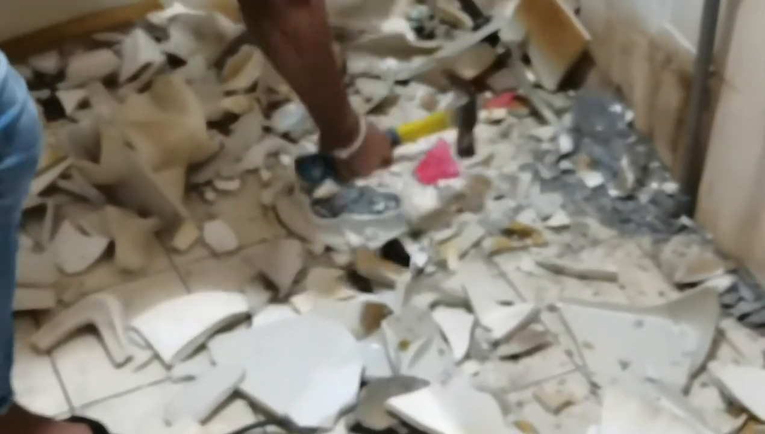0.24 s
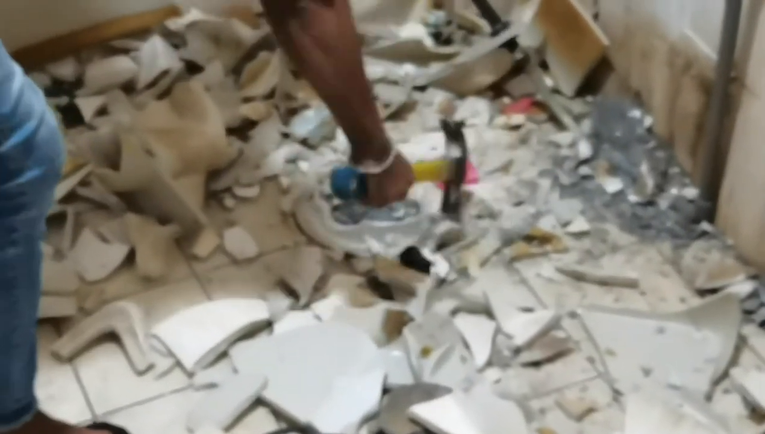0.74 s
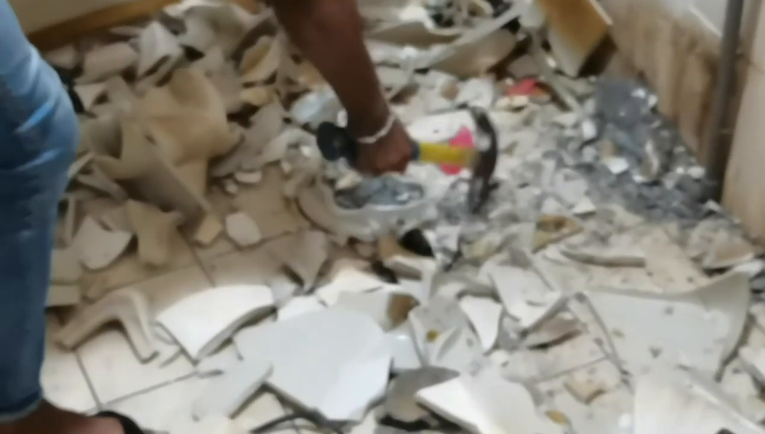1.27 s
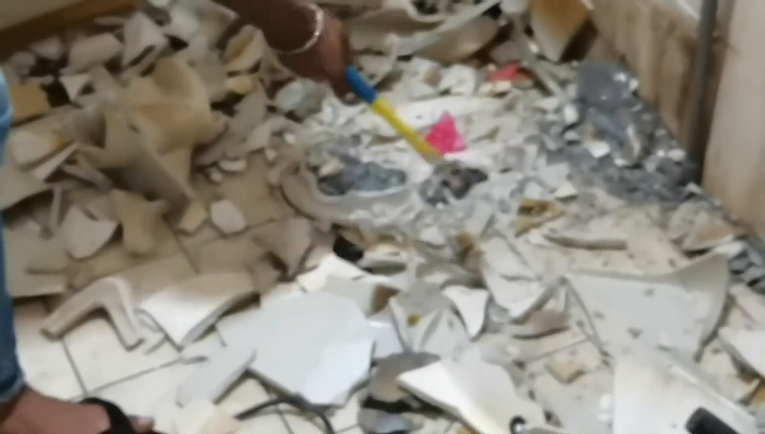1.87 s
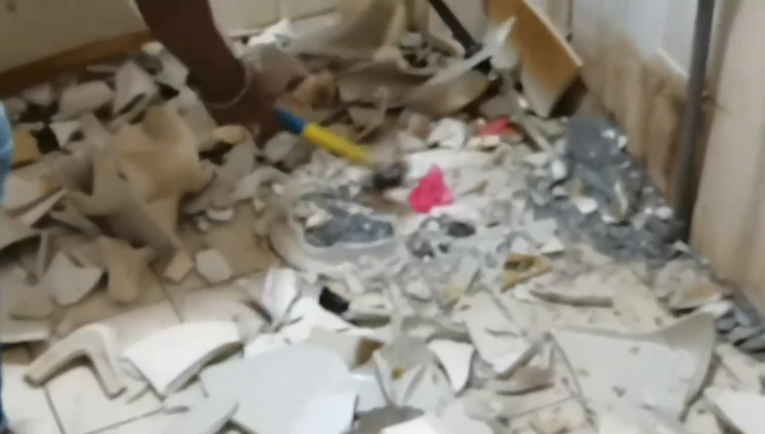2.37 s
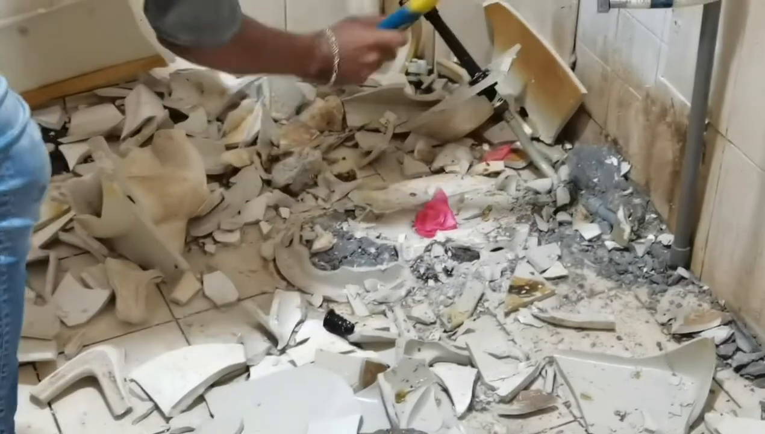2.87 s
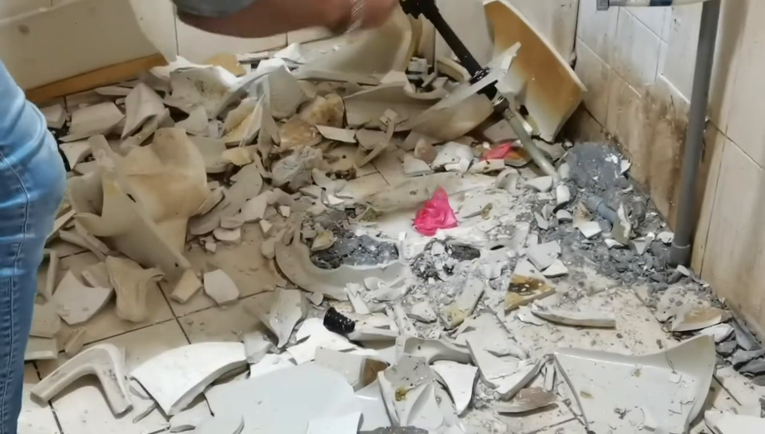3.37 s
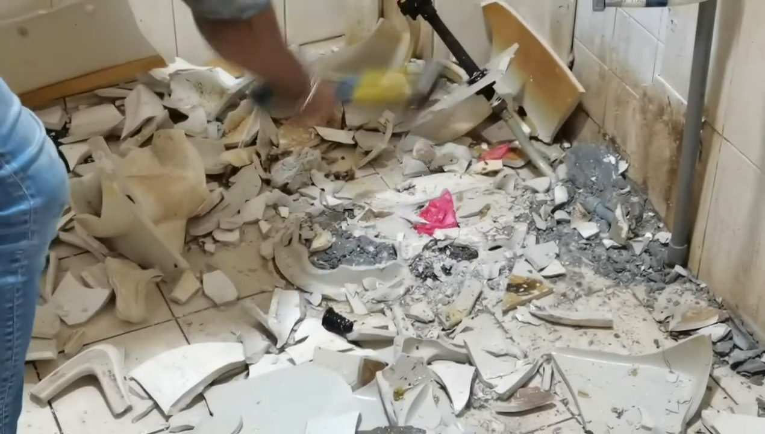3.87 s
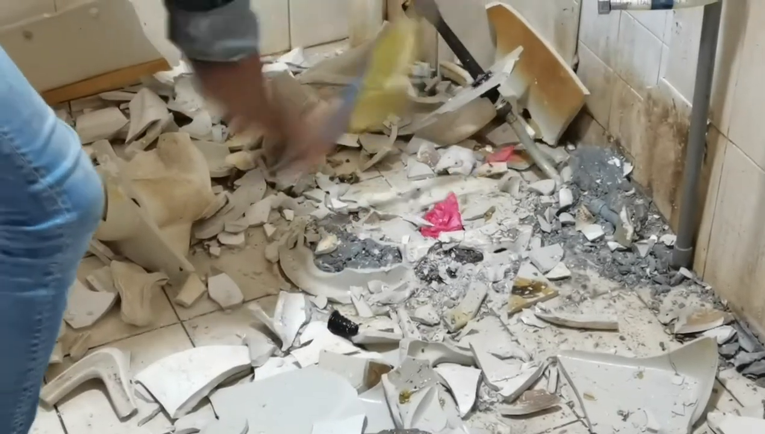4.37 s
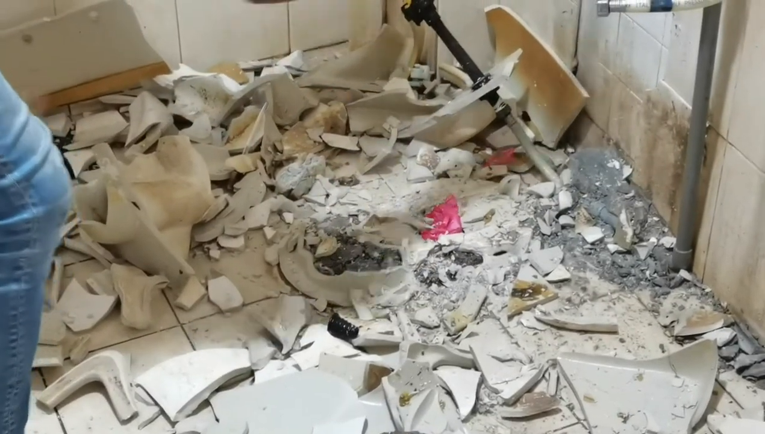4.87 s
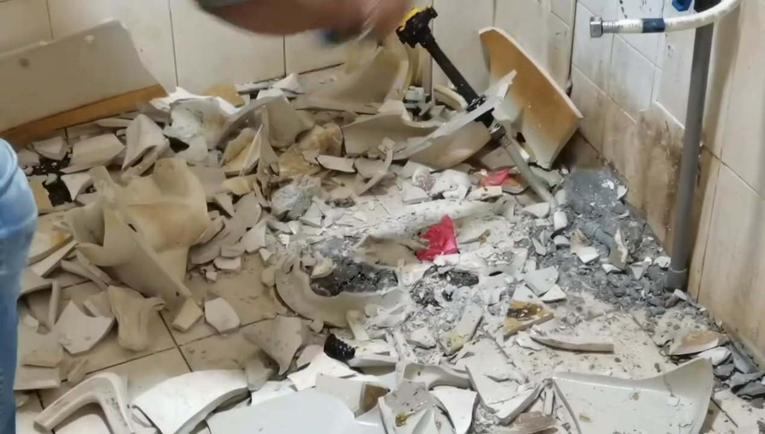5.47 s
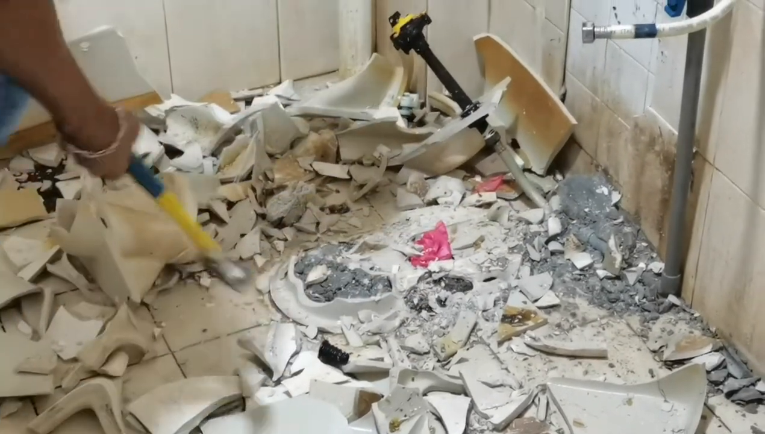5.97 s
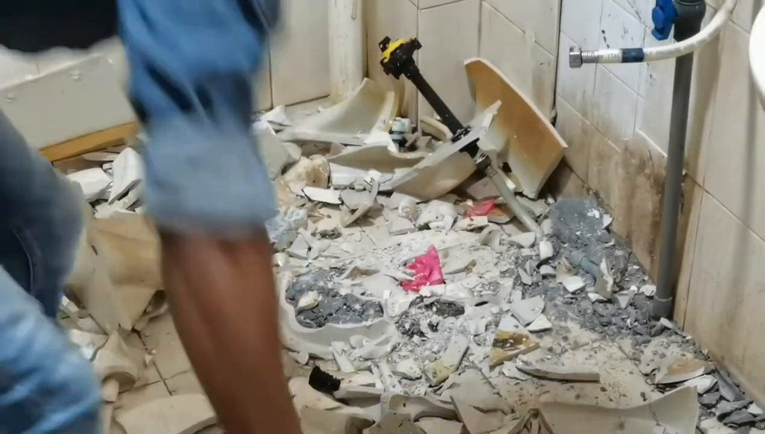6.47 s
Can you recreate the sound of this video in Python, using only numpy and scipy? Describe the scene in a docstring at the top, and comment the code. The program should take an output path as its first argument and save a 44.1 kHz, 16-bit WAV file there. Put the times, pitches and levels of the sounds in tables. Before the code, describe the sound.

A steel hammer pounds broken ceramic in rapid, crunching blows, shards clinking and chips scattering across tiles in a small echoing bathroom.

```python
"""In a small tiled bathroom, a steel hammer pounds the remains of a ceramic toilet, at first nearly four blows
a second. Each blow is a burst of tiny random cracks that crushes ceramic, thuds into the floor, rings the
hammer head and throws chips and dust. Loose shards clink in the rubble as struck modes, and fragments scuff
the tiles. Decaying noise bands make the hard walls ring on. Now and then fingers bump the right microphone
port of a hand-held phone or rub it, over a faint building rumble."""
import sys
import numpy as np
from scipy import signal
from scipy.fft import rfft, irfft
from scipy.io import wavfile

SR = 44100
rng = np.random.default_rng(int(sys.argv[2]) if len(sys.argv) > 2 else 0)


def transcribe(u):
    """Save the signal u as a 16-bit wav file named by the first command-line argument.

    u: samples, shape (n,) or (channels, n), limited to [-1, 1]; the rate is SR.
    q: integer samples, one column per channel.
    """
    v = np.clip(np.atleast_2d(u).T, -1, 1)
    q = np.round(v * 32767).astype(np.int16)
    wavfile.write(sys.argv[1], SR, q)


N = 297222


def undb(db):
    """Decibels to gain."""
    return 10 ** (np.asarray(db) / 20)


def lookup(points, hz):
    """Read a table of (Hz, value) on a log-frequency axis."""
    f, value = np.transpose(points)
    return np.interp(np.log(np.maximum(hz, 1)), np.log(f), value)


def colour(x, points, size=2048):
    """Causal (minimum-phase) filter with the given (Hz, dB) response."""
    gain = undb(lookup(points, np.fft.rfftfreq(size, 1 / SR)))
    cepstrum = irfft(np.log(gain))
    # folding the cepstrum forward makes the response causal
    cepstrum[1:size // 2] *= 2
    cepstrum[size // 2 + 1:] = 0
    response = irfft(np.exp(rfft(cepstrum)))
    return np.apply_along_axis(lambda channel: signal.fftconvolve(channel, response)[:len(channel)], -1, x)


def band(x, lo_hz, hi_hz, order=2):
    """Butterworth band-pass."""
    return signal.sosfilt(signal.butter(order, [lo_hz, hi_hz], "band", fs=SR, output="sos"), x)


def unit(x):
    """Scale to unit energy per channel, averaged over the channels."""
    energy = np.mean(np.sum(x ** 2, axis=-1))
    return x / np.sqrt(energy)


def fade(t, t60):
    """Exponential decay, 60 dB down after t60 seconds."""
    return np.exp(-np.log(1000) * t / t60)


def ring(t, hz, t60):
    """One struck mode: a decaying sine."""
    return np.sin(2 * np.pi * hz * t) * fade(t, t60)


def resonate(x, hz, width_hz):
    """What one mode makes of x, at unit energy."""
    return unit(signal.lfilter(*signal.iirpeak(hz, hz / width_hz, fs=SR), x))


def add(out, s, x):
    """Mix a sound into both channels at time s."""
    i = max(int(s * SR), 0)
    out[:, i:i + x.shape[-1]] += x[..., :N - i]


def cracks(envelope, rate, spread_db=4):
    """Tiny fractures at random moments (rate per second), of uneven size and either sign."""
    n = len(envelope)
    size = undb(spread_db * np.minimum(rng.exponential(size=n), 3))
    happens = rng.random(n) < rate / SR
    return envelope * size * rng.choice([-1, 1], n) * happens


AMBIENCE_DB = -55.5
# Tone of the building rumble. Each row: frequency in Hz, level in dB.
RUMBLE_TONE = [(25, -4), (110, 0), (250, -11), (515, -22), (1100, -23), (2000, -30), (3300, -36),
               (8000, -39), (15000, -48)]


def ambience():
    """Faint steady rumble of the building: noise shaped by a falling spectrum."""
    return undb(AMBIENCE_DB) * np.sqrt(N) * unit(colour(rng.standard_normal((2, N)), RUMBLE_TONE))


# Reverberation of the tiled room. Each row: frequency in Hz, 60 dB decay time in seconds.
ROOM_DECAY = [(60, 0.37), (150, 0.26), (280, 0.3), (550, 0.4), (1300, 0.34), (3000, 0.24), (7500, 0.2),
              (14000, 0.099)]


def reflections(count=8):
    """Dense echoes from close tiled walls in octave-spaced bands, with the energy each keeps per sample."""
    centres_hz = np.geomspace(110, 14000, count)
    size = 2 ** 17
    noise = rfft(rng.standard_normal(size))
    hz = np.fft.rfftfreq(size, 1 / SR)
    # neighbouring bands crossfade
    echoes = [irfft(noise * lookup(np.c_[centres_hz, share], hz)) for share in np.eye(count)]
    kept_energy = fade(1 / SR, lookup(ROOM_DECAY, centres_hz)) ** 2
    return list(zip(echoes, kept_energy))


def fracture(force, walls, direct_db, shade_db=-4, rate=9000, spread_s=0.019, late_share=0.22):
    """Tiny cracks heard directly, then as a diffuse field that the force fills and the walls drain."""
    n = len(force)
    starts = rng.integers(0, SR * 2, 2)
    # part of the sound crosses the room before it joins the echo
    step = 1 / (SR * spread_s)
    crossing = signal.lfilter([step], [1, step - 1], force ** 2)
    feed = (1 - late_share) * force ** 2 + late_share * crossing
    field = 0
    for echo, keep in walls:
        level = np.sqrt(signal.lfilter([1], [1, -keep], feed))
        field = field + np.array([echo[i:i + n] for i in starts]) * level
    direct = unit(cracks(force, rate))
    # the right port faces away from the work and hears it slightly later
    far = np.pad(direct, (rng.integers(4, 14), 0))[:n]
    return unit(field) + undb(direct_db) * np.array([direct, undb(shade_db) * far])


# Fingers bumping the phone. Each row: start in seconds, level in dB, pitch in Hz.
FINGER_BUMPS = [(2.2219, -2.5, 1120), (2.2684, -3, 513), (2.2775, 1, 418), (2.303, -7, 117),
                (2.3561, -8.5, 333), (2.365, -12, 232), (2.3986, -3.5, 454), (2.447, -7, 402),
                (5.242, -22, 233), (6.201, -15, 440), (6.41, -30.5, 296)]
# A finger sliding over the right port. Each row: centre in seconds, level in dB, length in seconds.
PORT_RUBS = [(2.277, -22.5, 0.0045), (2.315, -15, 0.011)]


def handling(t, bump_cycles=2.2, skin_db=-18.5, rumble_db=1, rumble_lead_s=0.0058, rumble_stretch=1.4,
             left_db=-32):
    """Fingers reach the right port directly: dry bumps, and rubs that rumble in pressing and hiss in sliding."""
    port = np.zeros((2, N))
    for s, db, hz in FINGER_BUMPS:
        skin = band(rng.standard_normal(len(t)), 300, 4200) * fade(t, 0.022)
        add(port, s, undb(db) * (undb(skin_db) * skin - ring(t, hz, bump_cycles / hz)))
    slips = cracks(np.ones(N), rate=8600)
    rumble = undb(rumble_db) * unit(band(slips, 78, 530))
    hiss = unit(band(band(slips, 680, 1700, order=1), 160, 15000, order=4))
    for s, db, length in PORT_RUBS:
        since = np.arange(N) / SR - s
        # the press comes a little before the slide and swells more broadly
        press = np.exp(-((since + rumble_lead_s) / (rumble_stretch * length)) ** 2)
        slide = np.exp(-(since / length) ** 2)
        port += undb(db) * np.sqrt(N) * (press * rumble + slide * hiss)
    return port * np.array([[undb(left_db)], [1]])


def pieces(shock, count=7, lo_hz=950, hi_hz=7000):
    """Other fragments are met each time, so their damped modes lie somewhere else."""
    # one random pitch in each equal step of the log range
    place = (np.arange(count) + rng.random(count)) / count
    pitches = lo_hz * (hi_hz / lo_hz) ** place
    return unit(sum(resonate(shock, hz, 70) / np.sqrt(hz) for hz in pitches))


# Tone of the grinding. Each row: frequency in Hz, level in dB.
SCUFF_TONE = [(300, -22), (1200, -4), (2000, 1), (4000, 4.5), (7400, 0), (11000, 2), (15000, -19)]


def scuff(t, walls, length, direct_db=-6, pieces_db=-4):
    """Fragments slide over the tiles in one swell of grinding, which sets a few of them ringing."""
    grind = fracture(np.sin(np.pi * np.minimum(t / length, 1)), walls, direct_db)
    return unit(unit(colour(grind, SCUFF_TONE)) + undb(pieces_db) * pieces(grind))


# Rubble scuffed along the tiles. Each row: start in seconds, length in seconds, strength in dB.
SCUFF_CUES = [(6.16, 0.038, -28), (6.202, 0.022, -9.5), (6.445, 0.2, -21.5)]


def scuffing(t, walls):
    """Rubble is dragged over the tiles in single strokes of grinding."""
    out = np.zeros((2, N))
    for s, length, db in SCUFF_CUES:
        add(out, s, undb(db) * scuff(t, walls, length))
    return out


SHARD_WIDTH_HZ = 55  # bandwidth of each shard mode


def clink(t, walls, modes, chatter_db, contact_t60=.01, rise_s=.0006, direct_db=-5, first_bounce_db=-20,
          bounce_db=-5, neighbour_db=-13, count=3):
    """A shard knocks and bounces, ringing in its modes while its rough edge chatters on the rubble."""
    force = fade(t, contact_t60) * (1 - np.exp(-t / rise_s))
    for k, landing in enumerate(np.cumsum(rng.uniform(.008, .022, count))):
        bounce = (t > landing) * fade(np.abs(t - landing), 0.0092)
        force = force + undb(first_bounce_db + bounce_db * k) * bounce
    contact = fracture(force, walls, direct_db)
    out = 0
    for hz, db in modes:
        chatter = undb(chatter_db) * unit(band(contact, hz / 1.35, hz * 1.3))
        # the piece that it strikes answers at another pitch
        neighbour = undb(neighbour_db) * resonate(contact, hz * rng.uniform(1.1, 1.4), SHARD_WIDTH_HZ)
        out = out + undb(db) * unit(resonate(contact, hz, SHARD_WIDTH_HZ) + neighbour + chatter)
    return out


# Modes of the loose shards, listed by shard name. Each row: frequency in Hz, level in dB.
SHARD_MODES = {"slab": [(1528, -2.5), (2110, -9), (3822, -9.5), (7418, -12)], "rim": [(1830, -6),
               (4414, 2.5), (6410, 2), (10500, 0.5)], "wedge": [(2228, -5), (2874, -2), (3929, -14),
               (6965, -4.5)], "plate": [(2885, -21), (4134, -1), (6018, 5), (11175, 1.5)],
               "strip": [(2700, -7), (4820, -5.5), (7690, 5), (12600, -11)], "corner": [(4758, -4),
               (6104, -6.5), (8494, 0.5), (11757, 1)], "splinter": [(3746, -10), (5318, 1), (8451, 0),
               (13555, 1)], "sliver": [(5124, -14), (6535, -7), (9453, 6), (12220, 3)],
               "lid": [(2295, -11.5), (2510, 0), (3050, -28)], "tab": [(2433, -15), (3865, -4), (4295, -4),
               (7407, -9)], "base": [(1205, -0.5), (3000, -16), (10300, -14)], "flake": [(7827, -19),
               (10314, 0.5), (11950, -2)]}
# Loose shards knocking together. Each row: start in seconds, strength in dB, edge chatter in dB, shard name.
CLINK_CUES = [(0.002, 4.5, -6, "wedge"), (1.409, 0.5, 6, "rim"), (1.4391, 7.5, -8, "rim"),
              (1.5513, 5.5, -12, "wedge"), (1.607, 0, 2, "plate"), (1.787, -12.5, -3, "flake"),
              (2.858, -16, 3, "strip"), (2.8867, -6.5, -3, "strip"), (2.962, -11, -6, "strip"),
              (3.995, -18, -6, "sliver"), (4.032, -17, 2, "flake"), (4.096, -21.5, 2, "flake"),
              (4.807, 2.5, 1, "rim"), (4.8966, 3.5, 3, "corner"), (4.988, -12.5, -9, "sliver"),
              (5.035, -12, -15, "sliver"), (5.1633, -7, -1, "rim"), (5.2094, -4, -2, "flake"),
              (5.356, -4, -5, "flake"), (5.9547, -18.5, -35.5, "flake"), (6.0803, -33, -36, "splinter"),
              (6.163, -26, -22, "tab"), (6.2188, -3.5, -18, "slab"), (6.533, -23.5, -12, "base"),
              (6.627, -3, -8, "lid")]


def clinking(t, walls):
    """Loose shards knock together in the rubble, each shape with its own set of modes."""
    out = np.zeros((2, N))
    for s, db, chatter_db, shard in CLINK_CUES:
        add(out, s, undb(db) * clink(t, walls, SHARD_MODES[shard], chatter_db))
    return out


def dust(t, walls, settle_t60=0.39, lo_hz=5200, hi_hz=15000, direct_db=-3, count=14):
    """Crumbs of glaze trickle down through the rubble in faint, uneven ticks."""
    ticks = np.zeros(len(t))
    for when, size in rng.random((count, 2)):
        ticks[int(when * len(t))] = size ** 2
    force = signal.fftconvolve(ticks * fade(t, settle_t60), fade(t[:SR // 20], .012))[:len(t)]
    return unit(band(fracture(force, walls, direct_db), lo_hz, hi_hz))


LEAD_S = .008  # from the start of a blow's sound to its full force


def chips(t, count=30, delay=0.11, t60=.07, lo_hz=3000, hi_hz=14000, rattle=.8):
    """Small chips thrown by a blow land with high, short, rattling pings; late ones are weak."""
    out = np.zeros((2, len(t)))
    brief = t[:SR // 8]
    knots = brief[::100]
    for wait, pitch, *sizes in rng.random((count, 4)):
        start = LEAD_S - delay * np.log(1 - wait)
        speed = fade(start, .5)
        wobble = 1 + rattle * np.interp(brief, knots, rng.standard_normal(len(knots)))
        ping = speed * wobble * ring(brief, lo_hz + pitch * (hi_hz - lo_hz), t60)
        # its size differs between left and right, which places it
        out += np.outer(sizes, np.pad(ping, (int(start * SR), len(t)))[:len(t)])
    return unit(out)


# Modes of the hammer head, damped by the hand.
# Each row: frequency in Hz, half the bandwidth of each of its two resonators in Hz, level in dB.
HAMMER_MODES = [(4300, 70, 0), (4390, 110, -5), (5600, 70, -17), (7634, 70, -11), (8190, 90, -8),
                (11720, 100, -18)]


def hammer(shock, detune=0.01):
    """The steel head rings in its modes, struck and gripped a little differently each time."""
    luck = rng.standard_normal((len(HAMMER_MODES), 2))
    out = 0
    for (hz, half_width, db), (strike, grip) in zip(HAMMER_MODES, luck):
        hz = hz * (1 + detune * grip)
        mode = resonate(resonate(shock, hz, 2 * half_width), hz, 2 * half_width)
        out = out + undb(db + 2 * strike) * mode
    return unit(out)


# Tone of crushed ceramic. Each row: frequency in Hz, level in dB.
CRUSH_TONE = [(30, -12.5), (70, -7.5), (130, -3.5), (260, 0), (420, -2.5), (650, 1.5), (1300, 5.5),
              (2300, 3), (3300, 0), (5500, -3), (7500, 0.5), (8900, -4.5), (10300, 4), (15000, -7)]


def blow(t, walls, strength_db, brightness, thud_db, ring_db, snap_db, bite, fragment_hz,
         strike_db=0, strike_t60=0.019, fragment_db=-7, fragment_width_hz=260, crush_t60=0.084,
         crumble_db=-19, crumble_t60=0.32, crumble_per_snap=0.59, jolt_db=-25, jolt_growth=0.6,
         dust_db=-28, knock_db=8, crack_db=3.5, grit_db=4, glaze_db=-1.0, pieces_db=-7, chips_db=-11,
         shudder_db=-25, shudder_t60=.4):
    """The head bites in, crushes ceramic and rests in crumbling grit; a snappy blow crumbles less."""
    stopped = np.maximum(t - LEAD_S, 0)
    onset = np.exp(np.minimum(t - LEAD_S, 0) / bite)
    # grit gives way and lands in uneven spurts
    knots = t[::200]
    spurts = undb(np.interp(t, knots, 6 * rng.standard_normal(len(knots)) - 4))
    crumble = undb(crumble_db - crumble_per_snap * snap_db) * spurts * fade(stopped, crumble_t60)
    strike = undb(strike_db) * fade(stopped, strike_t60)
    force = onset * (strike + fade(stopped, crush_t60) + crumble)
    crush = colour(fracture(force, walls, snap_db), CRUSH_TONE)
    # the shock of the impact keeps steel and fragments vibrating after the crush is over
    shudder = undb(shudder_db) * fade(stopped, shudder_t60)
    shock = fracture(onset * (fade(stopped, 0.0072) + shudder), walls, 0)
    # the floor answers with a dull knock and a deep jolt
    thud = unit(band(crush, 110, 428)) + undb(-5.5) * resonate(crush, 253.4, 29)
    jolt = unit(ring(stopped, 72, 0.065) + ring(stopped, 90, 0.13))
    # the body cracks an octave below the brightness pivot, grit lies one above it and glaze splinters two
    crack = unit(unit(band(crush, 680, 3200, order=3)) + undb(pieces_db) * pieces(shock))
    # the fragment under the head resounds at its own pitch
    fragment = resonate(fracture(force, walls, snap_db), fragment_hz, fragment_width_hz)
    crack = unit(crack + undb(fragment_db) * fragment)
    grit = unit(band(crush, 3700, 8800, order=3)) + undb(chips_db) * chips(t)
    glaze = unit(band(crush, 9400, 17500, order=3))
    ceramic = undb(crack_db - brightness) * crack
    ceramic = ceramic + undb(grit_db + brightness) * grit
    ceramic = ceramic + undb(glaze_db + 2 * brightness) * glaze
    # the jolt grows faster than the blow, so only the hardest ones shake the floor deeply
    floor = undb(jolt_db + jolt_growth * strength_db) * jolt + undb(knock_db + thud_db) * thud
    return ceramic + floor + undb(ring_db) * hammer(shock) + undb(dust_db) * dust(t, walls)


BITE_LEAD_S = .005  # each blow's sound starts this long before its listed time
# Hammer blows and taps. Each row: time in seconds, strength in dB, brightness in dB per octave,
# floor thud in dB (before the knock gain), hammer ring in dB, direct snap over echo in dB,
# bite time constant in seconds, pitch of the struck fragment in Hz.
BLOW_CUES = [(0.029, 9, -2.2, -16, 1, -9, 0.0065, 2142), (0.264, 10, -0.5, -12.5, -5, -3.5, 0.00086, 2185),
             (0.515, 8.5, 0.1, -15, 2.5, -4.5, 0.0016, 1340),
             (0.773, 8, 0.2, -13.5, -3.5, -3.5, 0.00085, 1675),
             (1.023, 8, -0.1, -14, -12, -3, 0.00073, 1340), (1.284, 6.5, 1.5, -20, -2.5, -15, 0.003, 1800),
             (1.528, -1.5, 4.5, -13.5, 5, -10, 0.008, 2858), (1.834, 3.5, -4, -9, 5.5, -0.5, 0.003, 1590),
             (2.104, 1.5, 0, -6.5, 0.5, 4.5, 0.00093, 1206), (2.426, 0.5, 3, -5, -12.5, 8, 0.0022, 2580),
             (2.717, 4, 4, -13, -27.5, -3.5, .001, 2600), (3.005, 8.5, -2.5, -12.5, 5.5, -17, 0.003, 2060),
             (3.286, 11.5, 0.4, -17.5, -4, -24, 0.0012, 2860),
             (3.564, 10.5, -1.6, -17.5, -11, -7.5, 0.0016, 1260),
             (3.857, 9.5, 1.3, -15, -2, -6.5, 0.00095, 1880), (4.154, 6.3, 1.1, -14, -2, -20, 0.0038, 1610),
             (4.447, 9.5, -1.5, -11.5, 4.5, -5.5, 0.00095, 1360),
             (4.657, -16, -4.5, -32.5, -4, 14, 0.00057, 1900),
             (4.745, 7.5, -0.3, -14.5, 7.5, -26.5, 0.0025, 1346),
             (5.054, 6, 1.8, -13, 6, -34, 0.0017, 2970), (5.378, 6, -1.5, -9, 5, -2.5, 0.0017, 1390),
             (5.684, 2, .5, -16, -16, -4.5, 0.0017, 1970), (5.712, 1.5, 3.5, -27, -13, -22, 0.0016, 2800),
             (6.626, -14, -8, -12, -9, -8, .001, 2520), (6.652, -12.5, -2, -8, 5, 2, 0.0043, 1250),
             (6.716, 0.5, -0.3, -23, 13, -15, 0.0033, 2900)]


def pounding(t, walls):
    """The hammer falls again and again, each blow with its own force, tone and fragment."""
    out = np.zeros((2, N))
    for s, db, *manner in BLOW_CUES:
        add(out, s - BITE_LEAD_S, undb(db) * blow(t, walls, db, *manner))
    return out


# Shading of the right port. Each row: frequency in Hz, gain in dB.
RIGHT_PORT_SHADE = [(100, -6.5), (1000, -0.5), (2200, 0.5), (3000, -1.5), (3700, -3.5), (5000, -4.5),
                    (6400, -4), (7500, -8.5), (8200, -13.5), (9100, -47), (10000, -7.5), (12000, -8.5),
                    (15000, -14.5)]


def scene(centred_s=3.3, drift_db_per_s=0.65):
    """The work drifts to the left of a hand-held phone whose right port is shaded in the treble."""
    t = np.arange(SR // 2) / SR
    walls = reflections()
    air = scuffing(t, walls) + clinking(t[:SR // 3], walls) + pounding(t, walls)
    # each side takes half of the drift
    pan = undb(drift_db_per_s * (np.arange(N) / SR - centred_s) / 2)
    work = np.array([air[0] * pan, colour(air[1], RIGHT_PORT_SHADE) / pan])
    return ambience() + band(handling(t), 73, 18000) + work


def record(dry, top_hz=15400):
    """The phone rounds the highest peaks and cuts the top."""
    return signal.sosfilt(signal.ellip(8, .2, 70, top_hz, fs=SR, output="sos"), np.tanh(dry))


dry = scene()
out = record(dry)
transcribe(out)
```